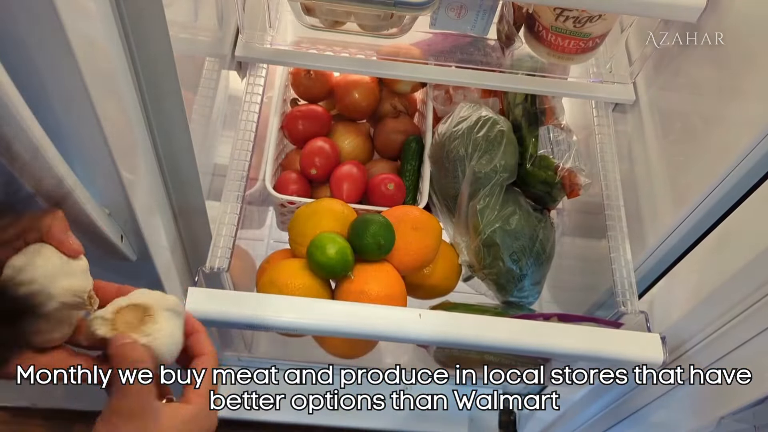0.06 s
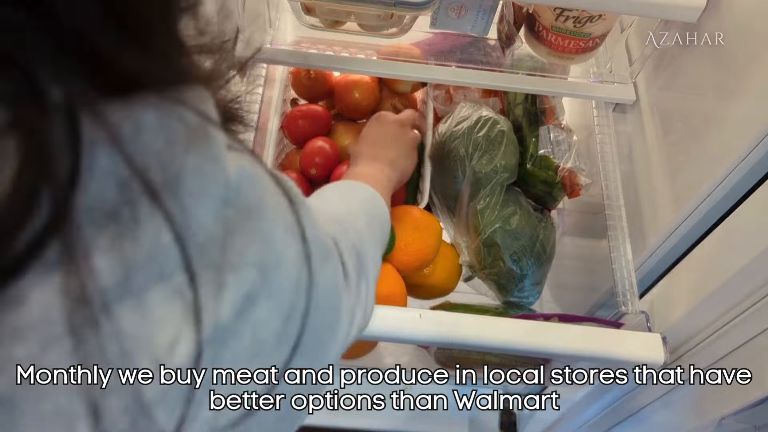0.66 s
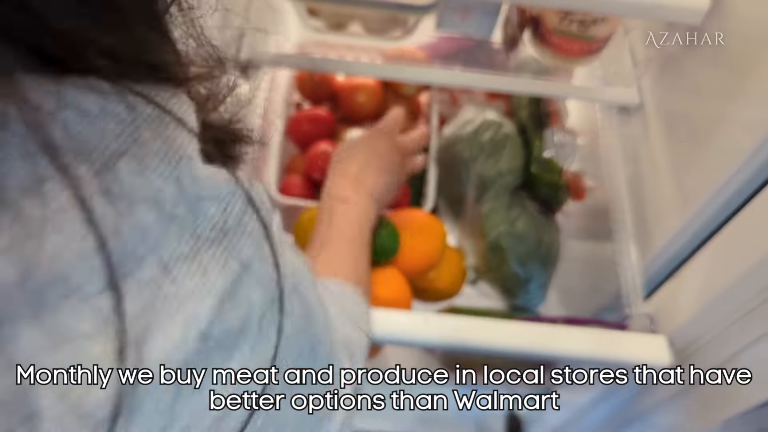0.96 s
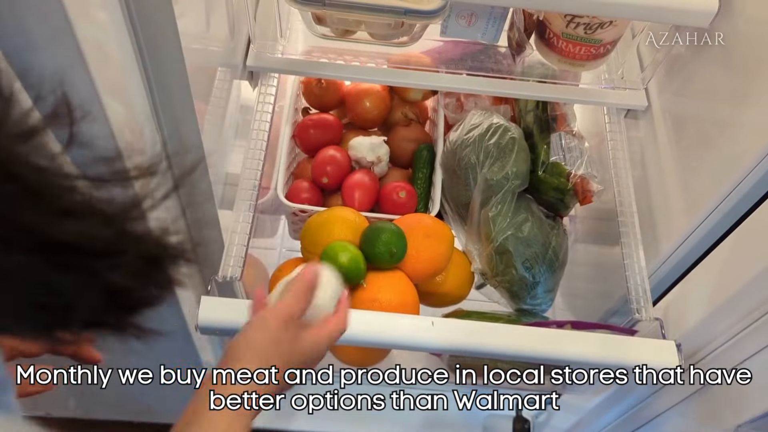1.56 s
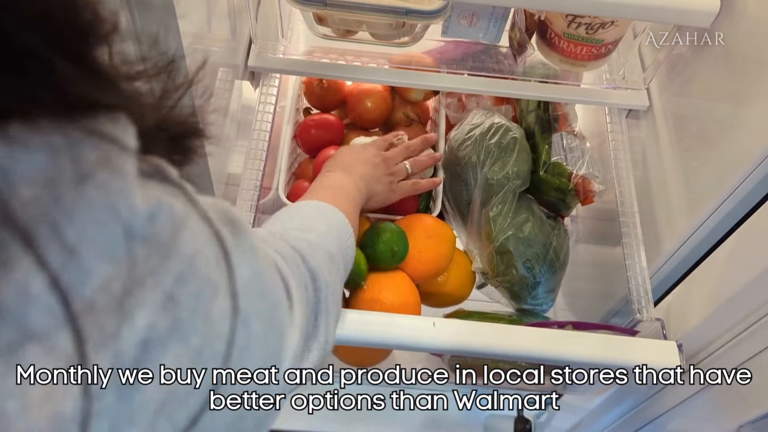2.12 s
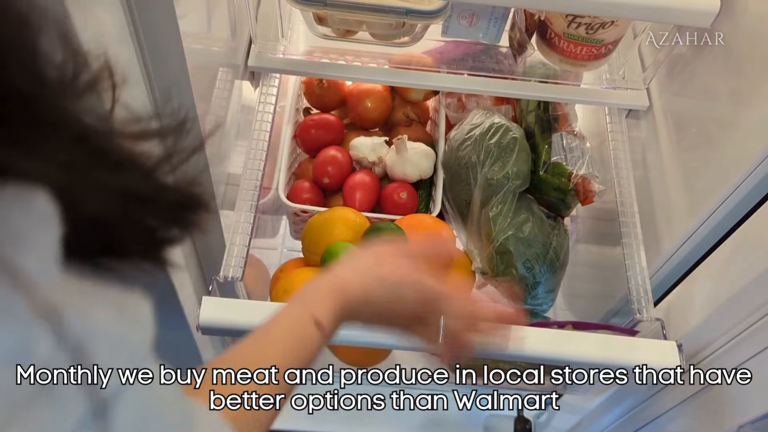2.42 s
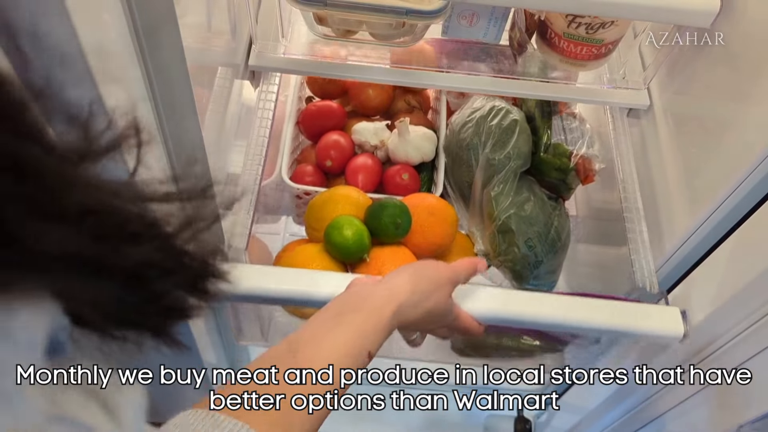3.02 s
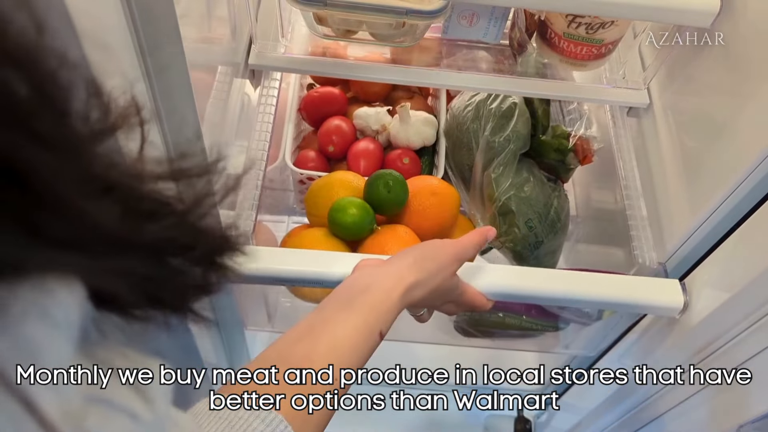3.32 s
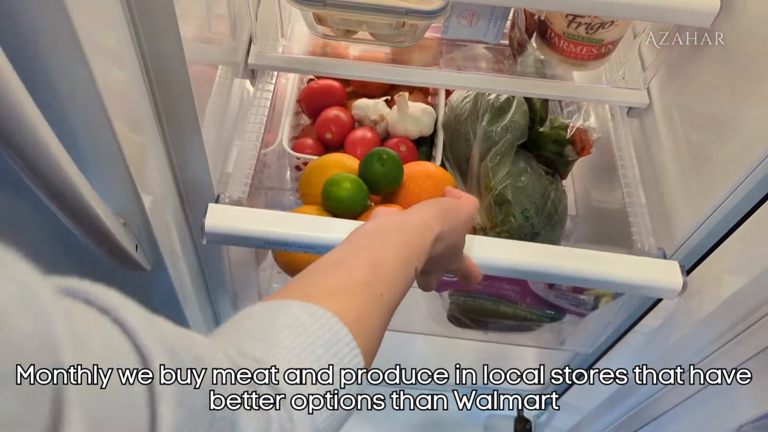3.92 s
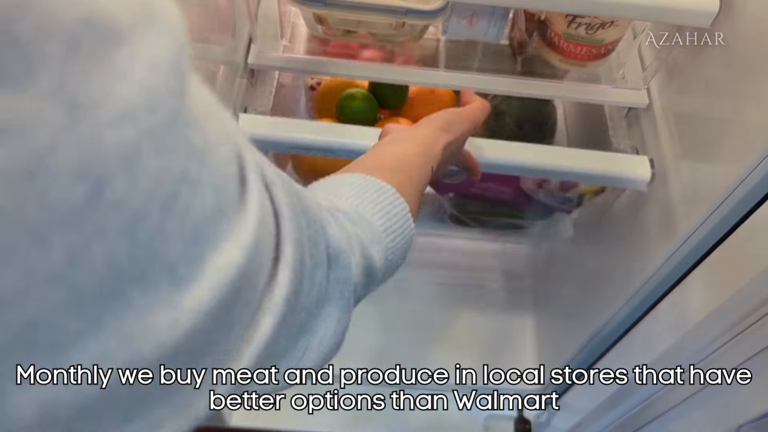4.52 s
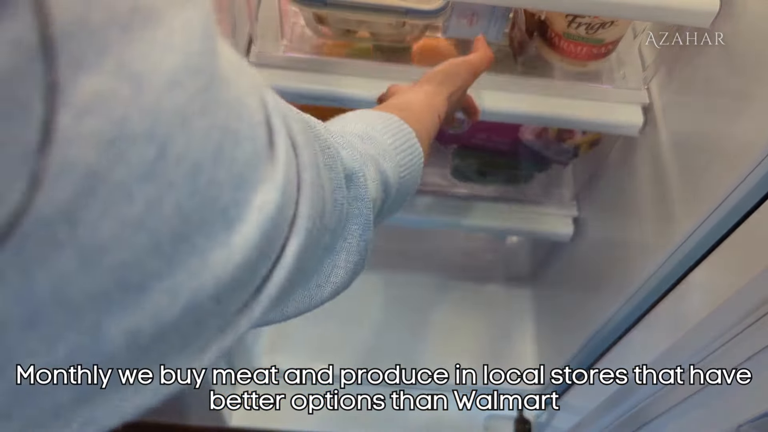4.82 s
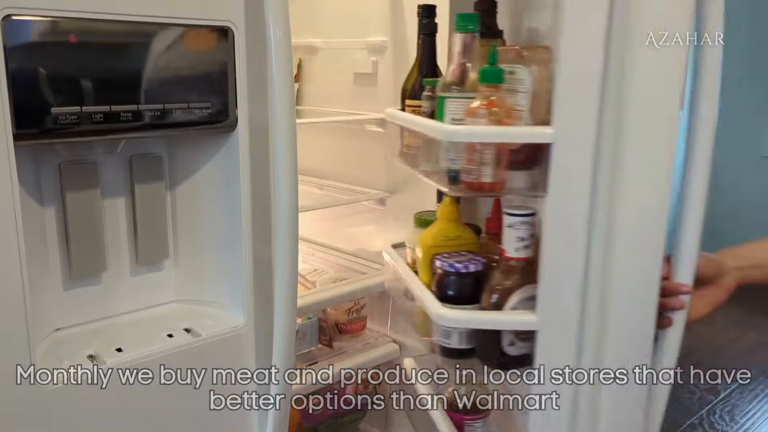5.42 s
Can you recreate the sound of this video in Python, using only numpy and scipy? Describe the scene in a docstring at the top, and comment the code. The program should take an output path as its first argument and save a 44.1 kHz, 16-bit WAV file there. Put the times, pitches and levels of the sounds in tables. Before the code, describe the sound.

Faint papery crackles, then a plastic refrigerator drawer knocks, rattles and bumps shut over a low hum, followed by light bottle clinks.

```python
"""Papery garlic skins crackle over a refrigerator compressor's hum as bulbs are laid in the crisper drawer.
A hand knocks the plastic front and shoves: the drawer jams, jolts free, rolls along its rails, bangs home.
Blows ring the drawer's modes, its weight booms the cabinet, and stick-slip makes the runners scrape.
After an abrupt jump in time the door swings, and bottles clink on its shelves in a small kitchen."""
import sys
import numpy as np
from scipy import signal
from scipy.fft import rfft, irfft
from scipy.io import wavfile
from scipy.ndimage import uniform_filter1d

SR = 44100
rng = np.random.default_rng(int(sys.argv[2]) if len(sys.argv) > 2 else 0)


def wav_record(signal):
    """Record a signal, one row per channel, as 16-bit PCM in the file named by sys.argv[1]."""
    frames = np.transpose(np.atleast_2d(signal))
    bounded = np.clip(frames, -1, 1)
    # unit amplitude maps onto the largest positive 16-bit level
    quanta = np.round(bounded * 32767).astype(np.int16)
    wavfile.write(sys.argv[1], SR, quanta)


N = 249606
T = np.arange(N) / SR
RING_T = T[:SR * 3 // 4]  # time axis of one decay

# Stereo width. Each row: frequency in Hz, side relative to mid in dB.
STEREO_WIDTH = [(60, -31), (125, -26), (250, -18), (500, -9), (1000, 0), (5000, -1), (8000, -13),
                (13000, -7)]
# Crinkle of garlic skin and produce bags. Each row: frequency in Hz, relative level in dB.
CRINKLE_SPECTRUM = [(300, -21), (900, 1.5), (2400, 2.5), (4500, 4), (7000, 8.5), (9000, 8), (11000, 5.5),
                    (15000, 0.5)]


def undb(db):
    """Decibels to gain."""
    return 10 ** (np.asarray(db) / 20)


def unit(x):
    """Scale to rms 1."""
    return x / np.sqrt(np.mean(x ** 2))


def at_hz(hz, points):
    """Read (Hz, value) points on a log-frequency axis."""
    f, value = np.transpose(points)
    return np.interp(np.log(np.maximum(hz, 1)), np.log(f), value)


def colour(x, points):
    """Filter by a (Hz, dB) spectrum."""
    size = x.shape[-1]
    return irfft(rfft(x) * undb(at_hz(np.fft.rfftfreq(size, 1 / SR), points)), size)


def resonate(x, peaks):
    """Ring a set of (Hz, width in Hz, dB) resonances; rms 1."""
    size = x.shape[-1]
    f = np.fft.rfftfreq(size, 1 / SR)
    body = sum(undb(db) / (1 + 2j * (f - hz) / width) for hz, width, db in peaks)
    return unit(irfft(rfft(x) * body, size))


def noise(size=len(RING_T)):
    """Stereo noise: channels alike in the bass, unrelated in the midrange."""
    mid, side = rng.standard_normal((2, size))
    return mid + colour(side, STEREO_WIDTH) * np.array([[1], [-1]])


def drift(count):
    """Random course through count points over the scene."""
    return np.interp(T, np.linspace(0, T[-1], count), rng.standard_normal(count))


def fade(t60_s):
    """Exponential decay, 60 dB in t60_s."""
    return np.exp(-np.log(1000) * RING_T / np.maximum(t60_s, 1e-3))


def stroke(start_s, length_s, attack_s, release_s):
    """Envelope of one movement: rise, hold, decay."""
    age_s = np.maximum(T - start_s, 0)
    return (1 - np.exp(-age_s / attack_s)) * np.exp(-np.maximum(age_s - length_s, 0) / release_s)


def add(out, start_s, x):
    """Mix x into out at start_s."""
    i = max(int(start_s * SR), 0)
    out[:, i:i + x.shape[-1]] += x[..., :N - i]


def speckle(x, depth_db, size=256):
    """Tiny contacts ring at their own pitches: random time-frequency patches stand out."""
    cells = signal.stft(x, SR, nperseg=size)[2]
    patches = uniform_filter1d(rng.standard_normal(cells.shape[1:]), size=3, axis=0)
    patches = unit(uniform_filter1d(patches, size=5, axis=1))
    return signal.istft(cells * undb(depth_db * patches), SR)[1][:, :x.shape[-1]]


def friction(spectrum, slips_per_s, t60_s):
    """Stick-slip: tiny slips of uneven size, each a brief dying hiss; rms 1."""
    slipping = rng.random(N) < slips_per_s / SR
    slips = slipping * undb(4.5 * np.minimum(rng.exponential(size=N), np.pi))
    energy = signal.lfilter([1], [1, -np.exp(-2 * np.log(1000) / (t60_s * SR))], slips ** 2)
    hiss = speckle(noise(N), depth_db=2.8)
    return unit(colour(hiss * np.sqrt(energy), spectrum))


def compressor(air_db=-45, waver=0.25, beat_hz=61.6, beat_db=-53):
    """Wavering motor lines, the lowest beating against an extra one, over the fan's air."""
    # Motor lines. Each row: frequency in Hz, level in dB.
    motor_lines = [(53.8, -47.5), (118.4, -55.5), (161.5, -56.5), (215.3, -51.5), (236.9, -54),
                   (355.3, -51)]
    # Fan and kitchen air. Each row: frequency in Hz, relative level in dB.
    air_spectrum = [(24, -21), (38, -8.5), (161, -6), (221, -1), (287, -8), (355, -5.5), (404, -13.5),
                    (540, -12.5), (702, -26.5), (801, -18), (875, -28.5), (980, -22.5), (1130, -29.5),
                    (2680, -37.5), (3200, -42.5), (5740, -48), (6550, -43), (9000, -52), (10500, -57),
                    (16000, -57)]
    out = undb(air_db) * unit(colour(noise(N), air_spectrum))
    for hz, db in list(motor_lines) + [(beat_hz, beat_db)]:
        phase = 2 * np.pi * (hz * T + rng.random())
        out += np.sqrt(2) * undb(db) * (1 + waver * drift(count=40)) * np.sin(phase)
    return out


def kitchen(x, wet_db=-7, build_s=0.00048, bass_db=-8):
    """Add the room's diffuse echo; the top treble dies first."""
    # Reverberation. Each row: frequency in Hz, t60 in seconds.
    room_t60 = [(100, .4), (550, .52), (2500, .68), (8000, .45), (15000, .33)]
    f, t, cells = signal.stft(noise(), SR)
    decay = np.exp(-np.log(1000) * t / at_hz(f, room_t60)[:, None])
    tail = signal.istft(cells * decay, SR)[1][:, :len(RING_T)]
    tail = colour(unit(tail), [(90, bass_db), (300, 0.016)]) * (1 - np.exp(-RING_T / build_s))
    echo = signal.fftconvolve(x, tail / np.sqrt(len(RING_T)), axes=-1)[:, :N]
    return x + undb(wet_db) * echo


def door_motion(delay_s, slow_db=-62.5, fast_db=-38.5, midpoint_s=5.504, ramp_s=0.023):
    """Strength of the door's rubbing, rising with its speed."""
    speed = .5 + .5 * np.tanh((T - midpoint_s - delay_s) / (2 * ramp_s))
    return undb(slow_db + (fast_db - slow_db) * speed)


def door(rub_db=-3, chatter_db=-3, clink_db=-11, hiss_delay_s=0.045):
    """The swinging door rubs, hisses once fast, shakes its shelves and makes its bottles touch."""
    # Door friction. Each row: frequency in Hz, relative level in dB.
    swing_spectrum = [(300, 3.5), (800, -5.5), (1050, 0), (1300, -9), (2200, -3.5), (3500, -10),
                      (5500, -14), (9000, -10.5), (15000, -32)]
    # Resonances of the loaded shelves and of the bottles. Each row: centre in Hz, width in Hz, gain in dB.
    shelf_modes = [(1010, 50, -0.5), (1496, 90, -1), (1974, 50, 0.5), (2252, 60, -0.5), (2590, 87, -3),
                   (8660, 1000, -20)]
    bottle_modes = [(1060, 140, 7), (2040, 100, 2), (3300, 320, 0), (3900, 160, -6), (8570, 850, -5.5)]
    # Bottle contacts. Each row: start in seconds, level in dB.
    clinks = [(4.954, -37), (5.247, -28.5), (5.271, -31), (5.3137, -44), (5.5576, -31.5), (5.6121, -36)]
    # Light taps knock on the plastic door.
    # Each row: start in seconds, level in dB, body and edge in relative dB.
    door_taps = [(4.955, -44.5, -11, 6.5), (5.316, -48.5, -17, 4), (5.444, -39, -2, -37),
                 (5.457, -35.5, -1.5, -56)]
    rub = friction(swing_spectrum, slips_per_s=930, t60_s=0.1)
    dull = colour(rub, [(2800, 0), (5000, -30)])
    out = undb(rub_db) * door_motion(0) * dull + door_motion(hiss_delay_s) * (rub - dull)
    contacts = friction([(400, -15), (900, 0)], slips_per_s=700, t60_s=.03)
    out += undb(chatter_db) * door_motion(hiss_delay_s / 2) * resonate(contacts, shelf_modes)
    for start_s, db in clinks:
        add(out, start_s, undb(db + clink_db) * resonate(noise(), bottle_modes) * fade(0.16))
    return out + knocks(door_taps, clack_db=0.5)


def fingers(tighten_db_per_s=69, brush_db=-25.5, brush_s=0.19):
    """Rubbing strength: each grip tightens and lets go, with a light brush before and after."""
    # A bulb is turned or bedded down. Each row: start in seconds, length in seconds, level in dB.
    handlings = [(0.0, 0.027, -46.5), (0.09, 0.035, -51), (0.619, 0.07, -47.5), (0.754, 0.053, -57.5),
                 (1.21, 0.087, -57), (1.267, 0.11, -51), (1.878, 0.14, -42), (2.034, 0.056, -53.5)]
    out = np.zeros(N)
    for start_s, length_s, db in handlings:
        grip = stroke(start_s, length_s, attack_s=0.009, release_s=0.014)
        tightening = undb(-tighten_db_per_s * np.maximum(start_s + length_s - T, 0))
        brush = undb(brush_db) * np.exp(-((T - start_s - length_s) / brush_s) ** 2)
        out += undb(db) * (tightening * grip + brush)
    return out


def garlic(skin_db=-1.5, husk_db=-9, snap_db=-10):
    """Under the fingers thin skin crackles finely, the stiffer husk lower and coarser; a few snaps."""
    # Outer husk. Each row: frequency in Hz, relative level in dB.
    husk_spectrum = [(600, -22), (2000, -2), (3500, 0), (6000, -5), (12000, -20)]
    # Skin snaps. Each row: start in seconds, level in dB.
    snaps = [(0.077, -36), (0.097, -33.5), (0.4846, -43.5), (0.635, -38), (0.677, -33.5), (1.2833, -35.5),
             (1.351, -40), (2.003, -42)]
    skin = friction(CRINKLE_SPECTRUM, slips_per_s=1800, t60_s=.025)
    husk = friction(husk_spectrum, slips_per_s=260, t60_s=.012)
    out = fingers() * (undb(skin_db) * skin + undb(husk_db) * husk)
    for start_s, db in snaps:
        snap = unit(colour(speckle(noise(), depth_db=-5.5), CRINKLE_SPECTRUM))
        add(out, start_s, undb(db + snap_db) * snap * fade(0.095))
    return out


def rubs():
    """Hand, produce and runners slide briefly on plastic, each in one broad band."""
    # Each row: middle in seconds, half-width in seconds, band centre in Hz, level in dB.
    swells = [(0.102, 0.027, 9600, -45), (0.803, 0.042, 2210, -55), (2.072, 0.022, 2370, -54),
              (4.5, 0.12, 1960, -45), (4.684, 0.046, 2000, -42.5)]
    out = np.zeros((2, N))
    for middle_s, half_width_s, hz, db in swells:
        band = [(hz / 3, -25), (hz * .7, -7), (hz, 0), (hz * 1.25, -4), (hz * 3, -35)]
        swell = np.exp(-((T - middle_s) / half_width_s) ** 2)
        out += undb(db) * swell * friction(band, slips_per_s=1300, t60_s=0.17)
    return out


def drawer_motion(settle_s=0.02):
    """Strengths of judder, scrape and hiss: steady in each push; the last two surge as the load lurches."""
    # Each row: start in seconds, length in seconds, judder, scrape and hiss in dB.
    pushes = [(2.859, 0.2, -32.5, -38.5, -57), (3.153, 0.39, -28, -42.5, -76.5),
              (3.563, 0.34, -43, -43, -65.5), (3.822, 0.2, -21, -56, -63), (4.1, 0.14, -23, -22, -33.5),
              (4.253, 0.506, -34, -33.5, -50)]
    # Each row: peak time in seconds, build-up in seconds, scrape surge in dB, bag hiss in dB.
    lurches = [(3.151, 0.033, -19, -35.5), (3.91, 0.02, -23, -54.5), (4.089, 0.017, -14, -19),
               (4.811, 0.014, -8.5, -21)]
    out = np.zeros((3, N))
    for start_s, length_s, *levels_db in pushes:
        out += np.outer(undb(levels_db), stroke(start_s, length_s, attack_s=0.02, release_s=0.018))
    for peak_s, build_s, *levels_db in lurches:
        surge = np.exp(-np.abs(T - peak_s) / np.where(T < peak_s, build_s, settle_s))
        out[1:] += np.outer(undb(levels_db), surge)
    return out


def rails(judder_hz=52, judder_db=-1, scrape_db=-2, hiss_db=-4):
    """The drawer judders and scrapes on its runners; produce bags hiss against its walls."""
    # Runner friction. Each row: frequency in Hz, relative level in dB.
    scrape_spectrum = [(60, 14), (100, 19.5), (270, 12.5), (450, 9), (750, 0), (1200, -3.5), (1600, -5.5),
                       (2200, -13), (4000, -17), (8000, -35.5)]
    phase = 2 * np.pi * np.cumsum(judder_hz * (1 + 0.053 * drift(count=110))) / SR
    shaking, scraping, hissing = drawer_motion()
    judder = shaking * np.sin(phase) * (1 + .3 * drift(count=140))
    scrape = scraping * friction(scrape_spectrum, slips_per_s=1500, t60_s=0.25)
    hiss = hissing * friction(CRINKLE_SPECTRUM, slips_per_s=2100, t60_s=0.17)
    return undb(judder_db) * judder + undb(scrape_db) * scrape + undb(hiss_db) * hiss


def grinds():
    """Shoved hard, the runners bind and ring with coarse stick-slip."""
    # Each row: start in seconds, length in seconds, level in dB.
    binds = [(3.127, 0.035, -36.5), (4.079, 0.047, -21)]
    # Each row: centre in Hz, width in Hz, gain in dB.
    runner_modes = [(822, 30.6, 6), (986, 45, 1), (1553, 83, 1.5), (1880, 47, -7), (2370, 42, -7),
                    (3210, 60, -10.5)]
    slips = friction([(400, -20), (750, 0), (3500, 0), (6000, -15)], slips_per_s=500, t60_s=.02)
    force = sum(undb(db) * stroke(start_s, length_s, attack_s=0.009, release_s=0.018)
                for start_s, length_s, db in binds)
    return force * resonate(slips, runner_modes)


def catches(ring_db=-5):
    """A thin plastic edge snaps under the hand or past a catch, and the hard first knock clacks: a dry crack,
    then a brief ring."""
    # Each row: start in seconds, band centre in Hz, level in dB.
    snaps = [(2.5222, 2500, -21), (2.529, 1140, -19.5), (3.9065, 7240, -37.5), (4.083, 10400, -16.5),
             (4.2107, 8900, -15.5), (4.79, 1730, -21), (4.812, 12750, -22)]
    # Each row: centre in Hz, width in Hz, gain in dB.
    edge_modes = [(6780, 170, 6), (8440, 540, -1), (9250, 150, -9), (11260, 250, 5), (13000, 250, -5)]
    out = np.zeros((2, N))
    for start_s, hz, db in snaps:
        band = [(hz / 4, -26), (hz * .6, -13), (hz * .8, -3), (hz, 0),
                (hz * 1.4, -6), (hz * 2, -22), (hz * 4, -42)]
        crack = unit(colour(noise(), band)) * fade(0.051)
        ring = colour(resonate(noise(), edge_modes), band) * fade(0.12)
        add(out, start_s, undb(db) * (crack + undb(ring_db) * ring))
    return out


def pocks(swell_cycles=1.5):
    """A panel damped by the hand or the load gives a hollow pock a few cycles long."""
    # Each row: start in seconds, pitch in Hz, level in dB.
    panel_hits = [(2.5268, 574, -8), (2.545, 528, -25), (2.593, 590, -30), (2.687, 259, -26.5),
                  (2.732, 273, -27), (2.83, 288, -28.5), (3.112, 263, -24), (3.149, 616, -21),
                  (3.851, 260, -25), (4.0632, 406, -7.5), (4.081, 360, -10), (4.1, 1570, -13),
                  (4.168, 259, -19), (4.79, 162.3, -14.5)]
    out = np.zeros((2, N))
    for start_s, hz, db in panel_hits:
        age = RING_T * hz / swell_cycles
        add(out, start_s, undb(db) * age * np.exp(1 - age) * np.sin(2 * np.pi * hz * RING_T))
    return out


def thumps(gain_db=1, rise_s=0.0067):
    """The loaded drawer pushes softly on the cabinet, whose panels boom."""
    # Each row: frequency in Hz, level in dB, t60 in seconds.
    cabinet_modes = [(54, -41, 0.66), (77.6, 0, 0.068), (90.8, 7, 0.12), (151.5, -3.5, 0.075),
                     (231, -11, 0.044)]
    # Each row: start in seconds, level in dB.
    jolts = [(2.837, -30), (3.151, -19), (3.174, -22), (3.213, -20), (3.9, -8.5), (3.937, -16.5),
             (4.076, -18), (4.119, -16.5), (4.168, -8), (4.22, -19.5), (4.808, -6), (4.85, -11.5)]
    boom = sum(undb(db) * np.sin(2 * np.pi * hz * RING_T) * fade(t60_s) for hz, db, t60_s in cabinet_modes)
    out = np.zeros((2, N))
    for start_s, db in jolts:
        add(out, start_s, undb(db + gain_db) * boom * (1 - np.exp(-RING_T / rise_s)))
    return out


def blow(body_db, clack_db, tick_db, modes_db=-14, dense_db=-4, clatter_db=-10):
    """One blow on plastic: clear modes, a crack and its clatter between the walls."""
    # In Hz: top of the hollow body, knock, the clack's two ends, tick, highest fizz.
    registers_hz = [360, 570, 950, 3500, 7500, 14000]
    # Clear modes. Each row: frequency in Hz, level in dB, t60 in seconds.
    drawer_modes = [(158.4, -5.5, 0.32), (253, 4, 0.28), (331.6, -4, 0.18), (384.7, -8.5, 0.27),
                    (510, -2, 0.054), (588.3, 0, 0.095), (698, -7, 0.05), (813, 3.5, 0.08), (952, 4, 0.12),
                    (1584, -0.5, 0.06), (1873, -7, 0.12), (2256, -8, 0.18)]
    # Dense modes. Each row: frequency in Hz, relative level in dB.
    plastic_spectrum = [(100, 8.5), (200, 5.5), (600, 4.5), (900, 4), (1250, 2.5), (1700, 0.5), (2600, -4),
                        (3700, -10.5), (5500, -15.5), (8800, -17.5), (13000, -26), (16000, -38)]
    fizz_db = tick_db + 0.11 * (tick_db - clack_db)  # harder contacts reach higher
    weights = list(zip(registers_hz, [body_db, 0, clack_db, clack_db, tick_db, fizz_db]))
    grain = unit(colour(speckle(noise(), depth_db=1.8, size=512), plastic_spectrum))
    crack, clatter = fade(.065), undb(clatter_db) * fade(0.23)
    dense = colour(grain, weights) * (crack + clatter)
    modes = 0
    for hz, db, t60_s in drawer_modes:
        stereo_phase = np.arctan(undb(at_hz(hz, STEREO_WIDTH))) * rng.choice([-1, 1]) * np.array([[1], [-1]])
        detuned_hz = hz * (1 + 0.013 * rng.standard_normal())
        start_cycles = (hz > registers_hz[2]) * rng.random()
        phase = 2 * np.pi * (detuned_hz * RING_T + start_cycles) + stereo_phase
        modes += undb(db + at_hz(hz, weights)) * np.sin(phase) * fade(t60_s)
    contact_s = 0.00094 * (1 + undb(body_db))  # hollow blows come from soft, slow contacts
    return (undb(modes_db) * modes + undb(dense_db) * dense) * (1 - np.exp(-RING_T / contact_s))


def knocks(rows, clack_db, gain_db=10, clack_per_edge=0.2):
    """A series of blows on plastic; a sharper edge clacks more."""
    out = np.zeros((2, N))
    for start_s, db, body_db, edge_db in rows:
        hit = blow(body_db, clack_db + clack_per_edge * edge_db, tick_db=edge_db)
        add(out, start_s, undb(db + gain_db) * hit)
    return out


def drawer_knocks():
    """Blows on the drawer, from the first light taps to the bang home."""
    # Each row: start in seconds, level in dB, hollow body and sharp edge in dB relative to the knock.
    blows = [(0.678, -42.5, 10, 4), (1.954, -49.5, 12, 8), (2.523, -17.5, -8, -2),
             (2.685, -36, 11.5, -12.5), (2.82, -35, 8.5, -18), (3.108, -27.5, -8, -10),
             (3.14, -27, 3, -8.5), (3.15, -20.5, -7, -22), (3.496, -36, 3, -20), (3.544, -35.5, -2.5, -17),
             (3.737, -31.5, 1, -42), (3.831, -36.5, 8, -15), (3.868, -39, -12, 3), (3.885, -25, -2.5, -17),
             (3.905, -32.5, -13, 7), (4.063, -13.5, -12, -0.5), (4.081, -10, -13, -11),
             (4.099, -14.5, -8.5, -19), (4.114, -19, 0, -25.5), (4.163, -22.5, 9, -23), (4.21, -21, -8, 3),
             (4.776, -22.5, -5.5, 0), (4.79, -22, -7.5, 1), (4.811, -19, -1, 6)]
    return knocks(blows, clack_db=-7.5)


def scene(jump_s=4.878, far_hum_db=-3, room_share=0.56):
    """The drawer and its echo stop dead at the jump; the door follows, further from the compressor."""
    hum = compressor()
    near = pocks() + catches()  # these face the listener and feed the room less
    into_room = garlic() + drawer_knocks() + room_share * near + thumps() + rails() + grinds() + rubs()
    drawer = kitchen(into_room) + (1 - room_share) * near
    after = uniform_filter1d((T > jump_s) * 1., size=32)
    return (1 - after) * (drawer + hum) + after * (kitchen(door()) + undb(far_hum_db) * hum)


def record(dry, low_cut_hz=36, high_cut_hz=15600):
    """Lean some bands slightly left, round the loudest peaks, cut both ends of the spectrum."""
    lean = [(500, .26), (1000, .9), (2000, -.1), (9000, -.2), (12000, 1.7)]  # Hz, dB to the left
    left = colour(dry[0], lean)
    right = colour(dry[1], [(hz, -db) for hz, db in lean])
    rounded = np.tanh([left, right])
    low_cut = signal.sosfilt(signal.butter(4, low_cut_hz, "high", fs=SR, output="sos"), rounded)
    return signal.sosfilt(signal.ellip(8, .2, 70, high_cut_hz, fs=SR, output="sos"), low_cut)


dry = scene()
out = record(dry)
wav_record(out)
```